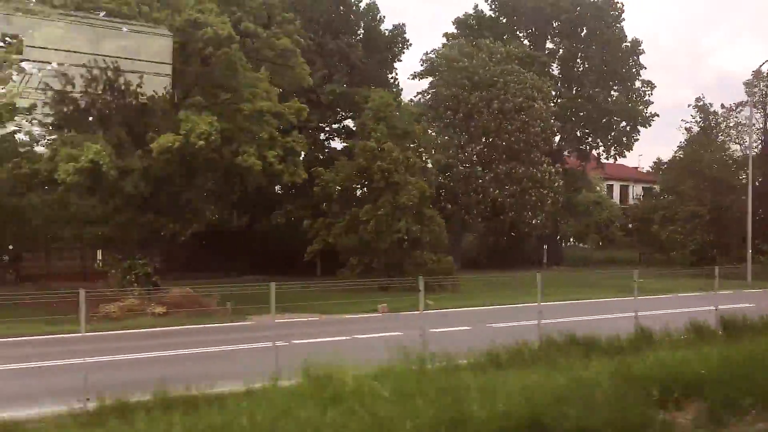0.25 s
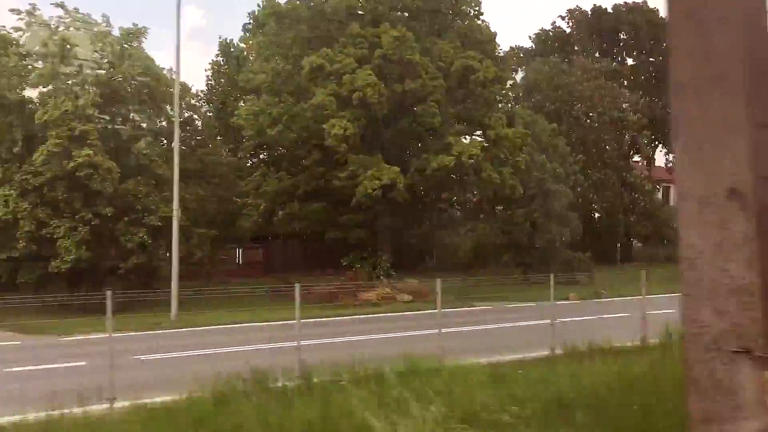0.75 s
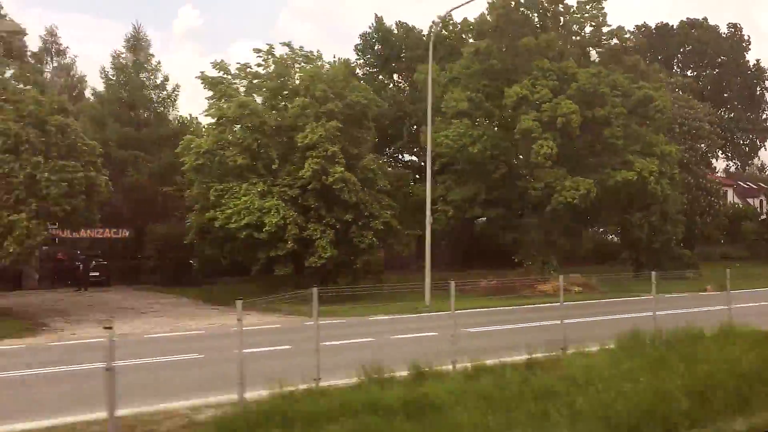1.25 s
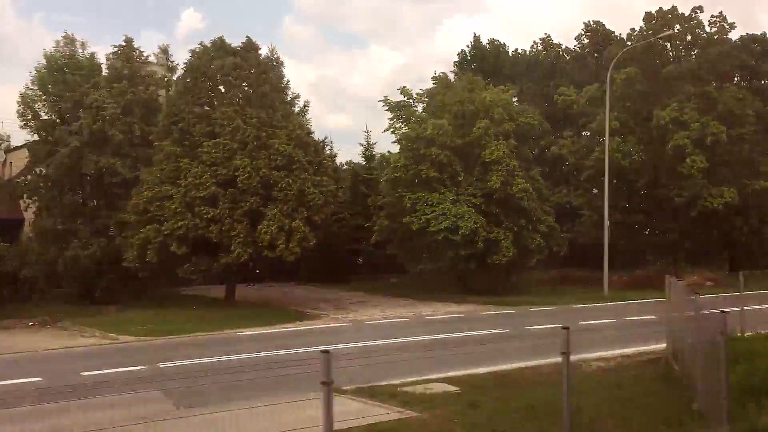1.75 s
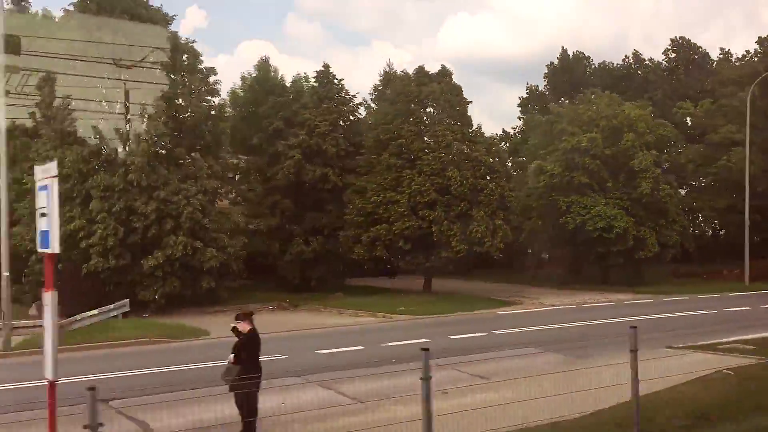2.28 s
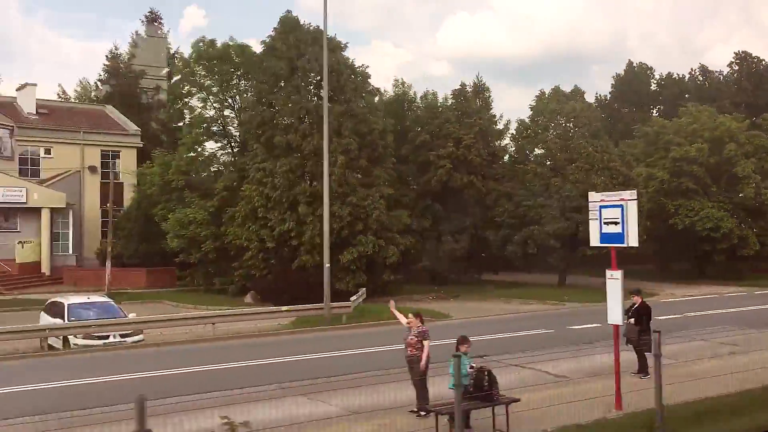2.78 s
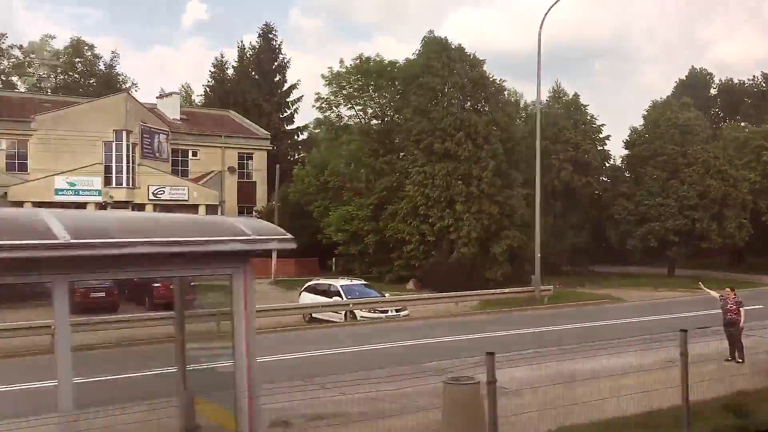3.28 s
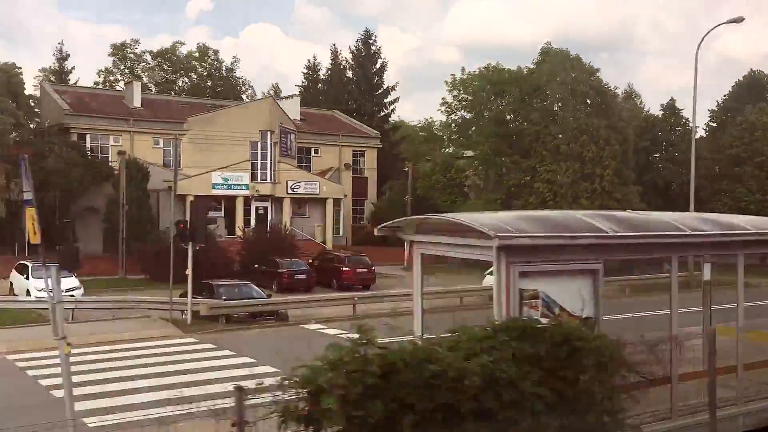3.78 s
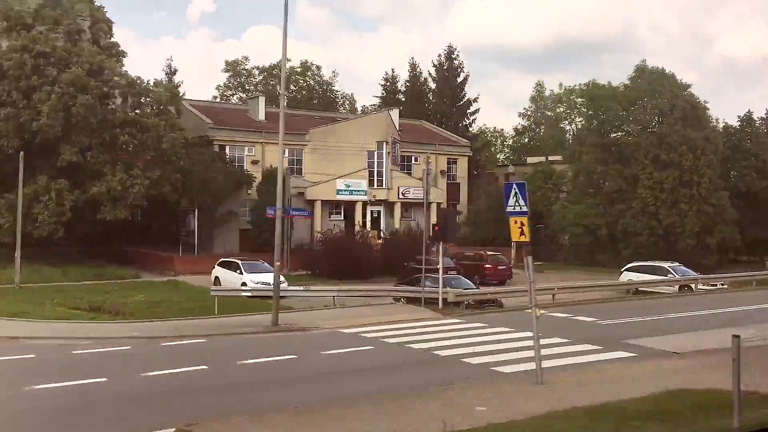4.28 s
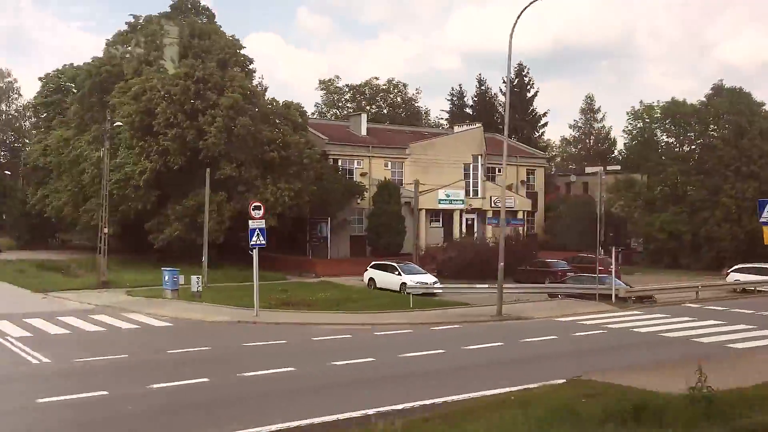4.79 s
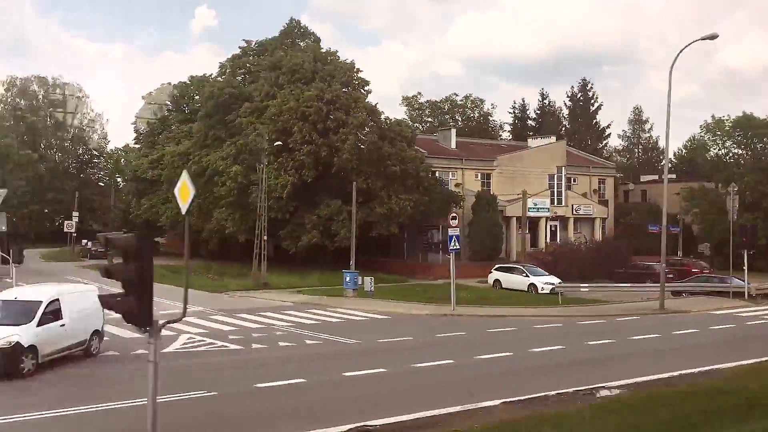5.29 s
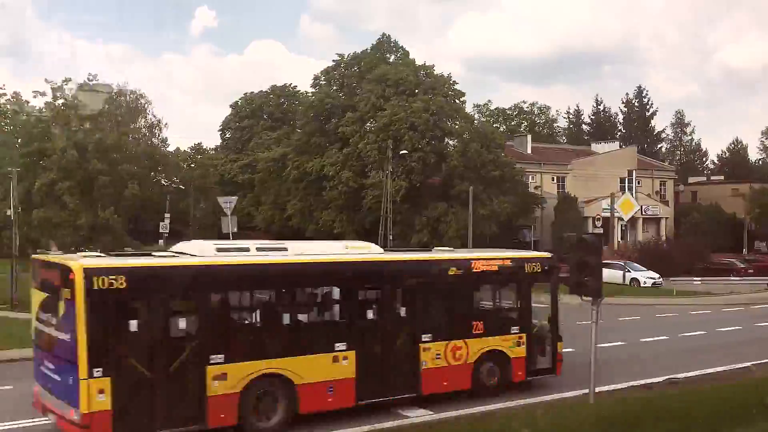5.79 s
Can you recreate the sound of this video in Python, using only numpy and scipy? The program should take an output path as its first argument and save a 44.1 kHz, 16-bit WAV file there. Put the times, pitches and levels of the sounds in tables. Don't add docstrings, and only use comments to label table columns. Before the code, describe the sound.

Interior of a passenger train at speed. A continuous bass-heavy rolling rumble fills the coach, with irregular soft booms from the floor, deep body lurches, faint wavering wheel ringing and very quiet air hiss. Small fittings tick now and then and a sole scuffs lightly. Past the middle, a nearby metal latch pings, knocks and snaps shut with a short rattle and ring. A single microphone sits inside, close to the latch.

```python
import sys
import numpy as np
from scipy import signal
from scipy.fft import rfft, irfft
from scipy.io import wavfile
from scipy.ndimage import uniform_filter1d

SR = 44100
rng = np.random.default_rng(int(sys.argv[2]) if len(sys.argv) > 2 else 0)


def to_linear_factor(level_db):
    exponent = np.asarray(level_db, float) / 20
    return 10 ** exponent


def unload_wav(signal):
    wavfile.write(
        sys.argv[1],
        SR,
        np.round(np.clip(np.atleast_2d(signal).T, -1, 1) * 32767).astype(np.int16),
    )


N = 266805


def rms_one(x):
    return x / np.sqrt(np.mean(x ** 2) + 1e-20)


def shape(x, spectrum):
    hz, level_db = np.transpose(spectrum)
    log_hz = np.log(np.arange(1, N // 2 + 2) * SR / N)
    gain_db = np.interp(log_hz, np.log(hz), level_db)
    return irfft(rfft(x) * to_linear_factor(gain_db), N)


def coloured(spectrum):
    return rms_one(shape(rng.standard_normal(N), spectrum))


def drift(rate_hz):
    r = np.exp(-2 * np.pi * rate_hz / SR)
    noise = rng.standard_normal(N + SR)
    return rms_one(signal.lfilter([1], [1, -2 * r, r * r], noise)[SR:])


def wavering(hz, wander_hz, rate_hz):
    pitch_hz = hz + wander_hz * drift(rate_hz)
    return np.sin(2 * np.pi * np.cumsum(pitch_hz) / SR)


def resonance(x, hz, width_hz):
    r = np.exp(-np.pi * width_hz / SR)
    return signal.lfilter([1, 0, -1], [1, -2 * r * np.cos(2 * np.pi * hz / SR), r * r], x)


def resonance_twice(x, hz, width_hz):
    return resonance(resonance(x, hz, width_hz), hz, width_hz)


def narrow(hz, width_hz):
    return rms_one(resonance_twice(rng.standard_normal(N), hz, width_hz))


def swells(rows, rest_db):
    t = np.arange(N) / SR
    gain = to_linear_factor(rest_db)
    for s, level_db, half_s in rows:
        gain = gain + to_linear_factor(level_db) * np.exp(-((t - s) / half_s) ** 2)
    return gain


def clicks(events):
    out = np.full(N, 1e-18)
    for s, level_db in events:
        out[round(s * SR)] = to_linear_factor(level_db)
    return out


def dying(hits, t60):
    return signal.lfilter([1], [1, -to_linear_factor(-60 / (t60 * SR))], hits)


def booms(events):
    out, t = np.zeros(N + SR), np.arange(SR // 4) / SR
    for s, level_db, hz, ring_s in events:
        start = round((s - ring_s) * SR)
        swell = (t / ring_s * np.exp(1 - t / ring_s)) ** 1.14
        out[start:start + len(t)] -= to_linear_factor(level_db) * swell * np.sin(2 * np.pi * hz * t)
    return out[:N]


# (pitch [Hz], level [dB per Hz])
ROLLING_SPECTRUM = [(13, -36), (22, -12.5), (114, 1), (203, -16.5), (288, -33.5), (462, -20.5),
                    (533, -27.5), (655, -21.5), (726, -24), (873, -25), (1260, -32.5), (1690, -30.5),
                    (3000, -43), (3900, -67), (6600, -120)]


def rolling():
    broad = to_linear_factor(-35.5 + 0.5 * drift(5.1)) * coloured(ROLLING_SPECTRUM)
    panel_hum = to_linear_factor(-36.5) * narrow(109.5, 45.3)
    return broad + panel_hum


# (time [s], peak level [dB], half length [s])
LURCHES = [(.1, -38, .05), (.51, -31, .05), (.72, -23.5, 0.024), (1.16, -33, .06), (1.37, -28, 0.038),
           (1.6, -36, 0.062), (1.91, -25, 0.032), (2.3, -30.5, 0.24), (2.65, -35, 0.12), (3.2, -32, 0.1),
           (3.55, -34, .1), (3.95, -28.5, 0.12), (4.22, -36, 0.045), (4.82, -35, .06), (5.17, -29, .15),
           (5.55, -45, .15)]


def sway():
    return to_linear_factor(-3.0) * swells(LURCHES, rest_db=-46) * wavering(48, 7.59, rate_hz=6.77)


# (pitch [Hz], level [dB per Hz])
HISS_SPECTRUM = [(1500, -21.5), (2500, -3), (3200, -0.5), (4200, -6.5), (6000, -7), (9000, -13),
                 (15600, -19.5)]
# (time [s], level [dB])
AIR_FLOW = [(0.0, -62), (0.77, -64.5), (1.09, -63.5), (1.74, -63.5), (3.5, -62.5), (3.86, -62), (3.99, -62),
            (4.99, -64), (5.14, -64.5), (5.8, -61.5), (6.05, -66)]


def window_air():
    s, level_db = np.transpose(AIR_FLOW)
    flow_db = np.interp(np.arange(N) / SR, s, level_db)
    return to_linear_factor(flow_db + 3.0) * coloured(HISS_SPECTRUM)


# (pitch [Hz], level [dB])
WHINES = [(4787, -75.5), (11765, -88)]


def electrics():
    return sum(to_linear_factor(level_db) * wavering(hz, 1.8, rate_hz=2.7) for hz, level_db in WHINES)


# (pitch [Hz], width [Hz], level [dB])
WHEEL_MODES = [(77.3, 23, -45.5), (180.2, 46.8, -44), (341, 51, -57.5), (513, 15.5, -58), (555.2, 24, -53),
               (619.7, 20.5, -52), (655, 18, -57.5), (697.9, 21, -49), (730.6, 16.4, -49.5),
               (751, 12.2, -52.5), (787, 8.5, -52), (829.6, 32, -60), (926, 26, -63), (1044, 21, -64),
               (1197, 12, -67.5), (1369, 35, -67), (1476, 3.6, -68), (1544, 33, -69.5), (2306, 53, -67)]
# (time [s], peak level [dB], half length [s])
SONG_SWELLS = [(.01, -38, 0.015), (.1, -43, 0.017), (.26, -42, 0.037), (.35, -34, 0.016), (.49, -53, 0.032),
               (.8, -43, .1), (1.05, -46, 0.11), (1.25, -40.5, 0.08), (1.6, -42, 0.077), (1.77, -38, 0.042),
               (1.9, -42.5, 0.024), (2.07, -38, 0.089), (2.31, -41, 0.081), (2.43, -42.5, 0.022),
               (2.55, -38, 0.037), (2.74, -46, 0.11), (3.02, -36, 0.014), (3.15, -42, 0.066),
               (3.48, -43, 0.039), (3.76, -38, 0.024), (3.9, -44, 0.064), (4.17, -44, 0.14),
               (4.43, -36.5, 0.031), (4.62, -37, 0.029), (4.81, -37, 0.047), (4.94, -32.5, 0.03),
               (5.1, -40, .03), (5.52, -36, 0.068), (5.72, -32.5, 0.043), (6.0, -38, 0.11)]


def wheels():
    modes = sum(to_linear_factor(level_db) * narrow(hz, 1.52 * width_hz) for hz, width_hz, level_db in WHEEL_MODES)
    flutter = to_linear_factor(0.5 + 0.48 * drift(45))
    song = swells(SONG_SWELLS, rest_db=-47) * flutter * wavering(730, 2.5, rate_hz=12.3)
    return modes + song


# (time of crest [s], peak level [dB], panel pitch [Hz], ring time [s], overtone level [dB])
BUMPS = [(.192, -19.5, 121, 0.0092, -24), (.522, -17, 113, .015, -18), (.572, -18, 117, 0.01, -14.5),
         (.752, -18.5, 106.8, 0.02, -18.5), (1.077, -17.5, 125, 0.012, -25),
         (1.299, -15.5, 111, 0.0068, -20), (1.334, -23.5, 122.4, 0.019, -27),
         (1.634, -20, 130.6, 0.01, -26), (1.865, -12.5, 114, .013, -47), (2.215, -17.5, 121.4, 0.0091, -22),
         (2.296, -20, 120.3, 0.01, -28), (2.625, -21, 138, 0.0044, -25), (2.649, -18.5, 110, 0.016, -38),
         (3.035, -20, 132, 0.0068, -33), (3.2, -14.5, 117.3, 0.011, -22), (3.548, -19, 106, 0.019, -38),
         (3.7, -15.5, 114.6, 0.0076, -27), (4.536, -21, 120.7, 0.015, -22), (4.779, -14, 118, 0.0091, -48),
         (5.092, -16.5, 110, 0.0063, -18), (5.139, -19.5, 120.6, .013, -20), (5.299, -16, 109, 0.0069, -26),
         (5.406, -11.5, 111.3, 0.0096, -30), (5.82, -16, 114, 0.017, -13.5)]
# (time of crest [s], peak level [dB], ring time [s])
JOLTS = [(0.349, -25.5, 0.0092), (1.024, -23, 0.0047), (1.174, -25, 0.0057), (1.252, -23.5, 0.0083),
         (1.597, -21.5, 0.0093), (1.669, -21, 0.0032), (1.944, -29, 0.0068), (2.109, -23.5, .011),
         (2.175, -21, 0.01), (2.543, -28, .027), (2.702, -23.5, 0.0054), (2.914, -25.5, 0.0085),
         (3.284, -32, 0.021), (3.511, -19, 0.0075), (3.624, -27, 0.0093), (3.753, -22.5, 0.0162),
         (3.789, -25.5, 0.0063), (3.828, -23.5, 0.0118), (3.951, -23, 0.0042), (4.413, -24, 0.023),
         (4.589, -26.5, 0.0167), (4.684, -20, 0.0057), (4.857, -26, 0.0085), (4.974, -25, 0.007),
         (5.348, -23.5, 0.013), (5.434, -16.5, 0.0057), (5.458, -23, 0.0067), (5.549, -28, 0.0085),
         (5.873, -18, 0.0056), (6.008, -29, 0.0077)]


def bumps():
    panel_hz, jolt_overtone_db = 110, -8
    blows = BUMPS + [(s, level_db, panel_hz, ring_s, level_db + jolt_overtone_db)
                     for s, level_db, ring_s in JOLTS]
    overtones = [(s, over_db - 11.5, 193 * hz / 115, 0.009) for s, _, hz, _, over_db in blows]
    return booms([blow[:4] for blow in blows]) + booms(overtones)


# (time [s], peak level [dB], half length [s])
SQUEAKS = [
    (1.02, -80, .07),
    (2.1, -80, .06),
]


def squeaks():
    return swells(SQUEAKS, rest_db=-120) * narrow(14250, 250)


# (time of peak [s], peak level [dB], rise time [s], 60 dB fade time [s])
SCUFFS = [
    (1.06, -53.5, 0.045, 1.2),
    (5.07, -44.5, 0.039, 0.97),
    (5.955, -49, 0.043, 1.4),
]
# (pitch [Hz], level [dB per Hz])
SCUFF_SPECTRUM = [(700, -23), (1200, -5), (2100, -1.5), (3000, 0.5), (3900, -6.5), (5000, -10), (6700, -10),
                  (9000, -18.5), (12000, -23), (15500, -38)]


def scuffs():
    t = np.arange(N) / SR
    strokes = 0
    for s, level_db, rise_s, t60 in SCUFFS:
        drop_db = np.where(t < s, 6.7 * ((t - s) / rise_s) ** 2, 60 * (t - s) / t60)
        strokes = strokes + to_linear_factor(level_db - drop_db)
    noise = to_linear_factor(0.58 * drift(23)) * coloured(SCUFF_SPECTRUM)
    dull = signal.sosfiltfilt(signal.butter(2, 4200, fs=SR, output="sos"), noise)
    brightness = (strokes / strokes.max()) ** 0.29
    return strokes * (dull + brightness * (noise - dull))


# (time [s], peak level [dB])
TICKS = [
    (0.8344, -36),
    (1.064, -39),
    (2.4435, -39.5),
    (5.003, -40.5),
    (5.55, -40),
]
# (pitch [Hz], level [dB per Hz])
TICK_SPECTRUM = [(3500, 0), (4900, -13), (5850, 2.5), (7200, -3.5), (8600, -3.5), (12500, -4), (15600, -11)]


def ticks():
    hits = clicks(TICKS)
    crack, tail = to_linear_factor(-8.0) * dying(hits, 0.0075), to_linear_factor(-16.0) * dying(hits, 0.25)
    return (crack + tail) * coloured(TICK_SPECTRUM)


# (time of crest [s], level [dB], pitch [Hz], ring time [s])
KNOCKS = [
    (.55, -43.5, 341, .02),
    (3.663, -35, 250, .004),
    (3.675, -24.5, 312, .007),
    (3.69, -29, 330, .007),
    (3.852, -38, 271, 0.01),
    (3.857, -45, 379.5, 0.011),
    (3.878, -30, 60.3, 0.0133),
    (3.96, -31, 44.4, 0.022),
    (3.968, -47, 1370, .012),
    (3.985, -42, 1085, .015),
]


def knocks():
    return booms(KNOCKS)


# (time [s], level [dB])
RATTLES = [
    (3.615, -44),
    (3.665, -45),
    (3.685, -58),
    (3.942, -39.5),
    (3.958, -39.5),
    (3.975, -49),
    (3.99, -53),
]
# (pitch [Hz], level [dB per Hz])
RATTLE_SPECTRUM = [(500, -52), (800, -2), (950, 11), (1090, 9), (1220, 3.5), (1370, -2), (1700, -5.5),
                   (2500, -30), (5000, -68)]


def rattles():
    shaking = uniform_filter1d(dying(clicks(RATTLES), 0.15), SR // 200)
    return shaking * coloured(RATTLE_SPECTRUM)


# (time [s], level [dB])
SCRATCHES = [
    (3.666, -53.5),
    (3.669, -59),
    (3.682, -55),
    (3.687, -63),
    (3.770, -65),
]
# (pitch [Hz], level [dB per Hz])
SCRATCH_SPECTRUM = [(4000, -30), (7000, 5), (9500, -3), (11000, -3), (13000, -7), (15600, 1)]


def scratches():
    hits = clicks(SCRATCHES)
    return (dying(hits, 0.04) + 0.32 * dying(hits, 0.25)) * coloured(SCRATCH_SPECTRUM)


# (time [s], level [dB])
PINGS = [
    (3.651, -38),
    (3.657, -43),
    (3.669, -57),
    (3.862, -40.5),
    (3.891, -61),
    (3.915, -63),
    (3.972, -70),
    (4.012, -72),
]
# (pitch [Hz], level [dB], 60 dB fade time [s])
SPRING_TONES = [(7370, -11.5, 0.39), (7200, -12, .2), (7310, -2, 0.17)]


def spring():
    touches = uniform_filter1d(clicks(PINGS), SR // 300)
    pings = 0
    for hz, level_db, t60 in SPRING_TONES:
        loudness = to_linear_factor(level_db + 4.7 * drift(78)) * dying(touches, t60)
        pings = pings + loudness * wavering(hz, 9.0, rate_hz=38)
    return pings


# (time [s], level [dB])
SNAPS = [
    (3.830, -27.5),
    (3.832, -25.5),
    (3.8435, -34.5),
    (3.856, -37.5),
    (3.885, -51),
]
# (time [s], level [dB])
TIP = [
    (3.832, -38),
]
# (pitch [Hz], width [Hz], level [dB], 60 dB fade time [s])
LATCH_BANDS = [(845, 5, -7.5, 0.45), (1500, 71, -14.5, 0.26), (1920, 64, -14.5, 0.077),
               (2546, 51, -20, 0.18), (2960, 100, -19, 0.18), (3400, 87, -32, .2), (3740, 170, -12, 0.23),
               (4650, 140, -12.5, 0.25), (5300, 86, -18, 0.24), (6000, 96, -20.5, 0.33),
               (6600, 180, -17.5, .25), (8270, 330, -21, .25), (9700, 330, -25, 0.37),
               (12950, 580, -16, 0.1)]
# (pitch [Hz], level [dB per Hz])
SNAP_SPECTRUM = [(120, -32), (200, 5.5), (258, 4.5), (430, -4), (843, -9.5), (1510, -13.5), (1780, -18),
                 (2520, -19.5), (8530, -28.5), (10200, -34), (13000, -39), (15600, -42)]


def latch():
    hits = clicks(SNAPS)
    ringing = 0
    for hz, width_hz, level_db, t60 in LATCH_BANDS:
        fade = dying(hits, 0.052) + 0.36 * dying(hits, t60)
        ringing = ringing + to_linear_factor(level_db - 7.0) * fade * narrow(hz, 2.1 * width_hz)
    contact = to_linear_factor(-31.0) * resonance(resonance(hits, 3600, 700), 4000, 700)
    tip = to_linear_factor(-5.5) * resonance_twice(clicks(TIP), 13000, 1500)
    crack = to_linear_factor(-28.0) * dying(hits, 0.016) + to_linear_factor(-10) * dying(hits, 0.32)
    echo = dying(np.roll(crack, 8), 0.027)
    return ringing + contact + tip + to_linear_factor(-45.0) * echo * coloured(SNAP_SPECTRUM)


def scene():
    background = rolling() + sway() + window_air() + electrics() + wheels() + bumps()
    small_sounds = squeaks() + scuffs() + ticks()
    closing = knocks() + rattles() + scratches() + spring() + latch()
    return (background + small_sounds + closing)[None]


def band_limit(x):
    return signal.sosfilt(signal.butter(12, 15710, fs=SR, output="sos"), x)


# (pitch [Hz], level [dB])
MICROPHONE = [(4200, -0.5), (5000, -4), (6200, -2), (7600, -4.5), (9300, -1.5), (10500, -4.5), (11600, -1),
              (15600, -2)]


def record(dry):
    top_cut = [(15700, 0), (15760, -60)]   # (pitch [Hz], level [dB])
    heard = shape(dry, MICROPHONE + top_cut)
    return band_limit(heard)


dry = scene()
out = record(dry)
unload_wav(out)
```